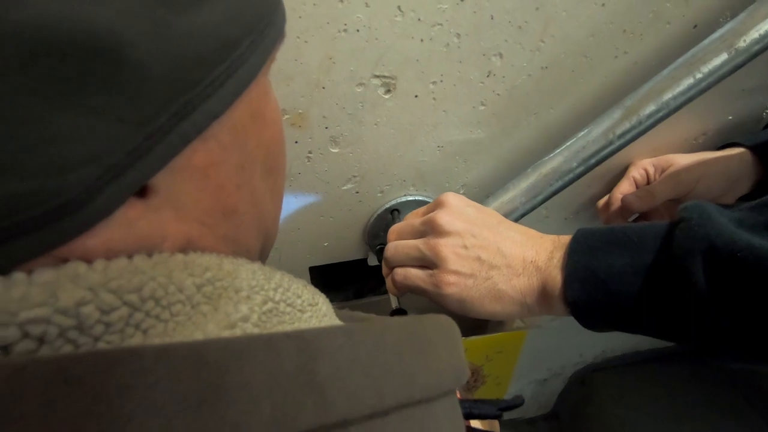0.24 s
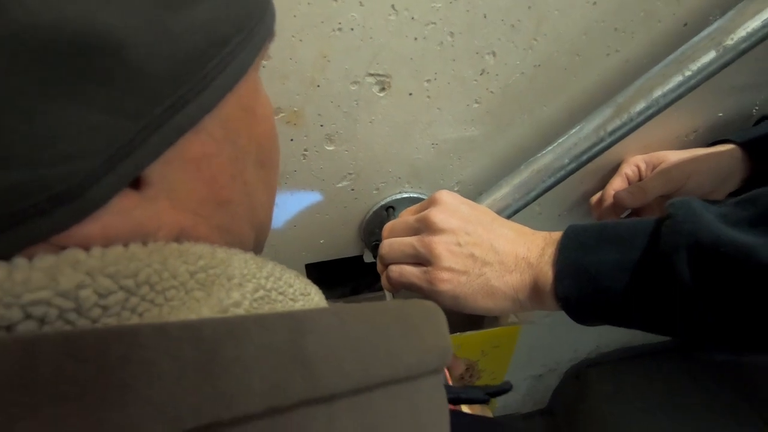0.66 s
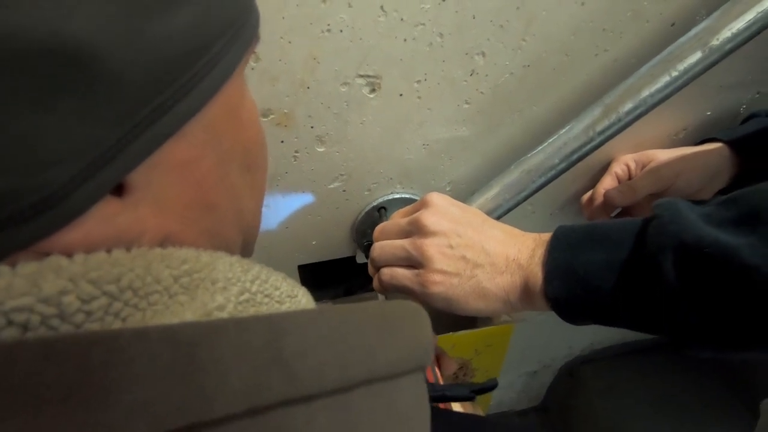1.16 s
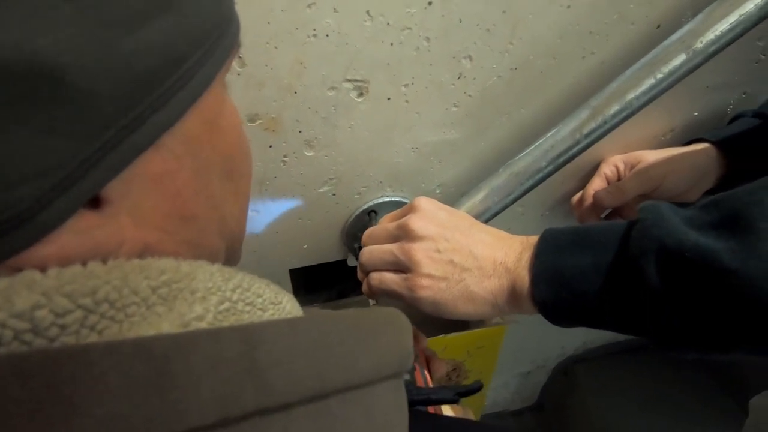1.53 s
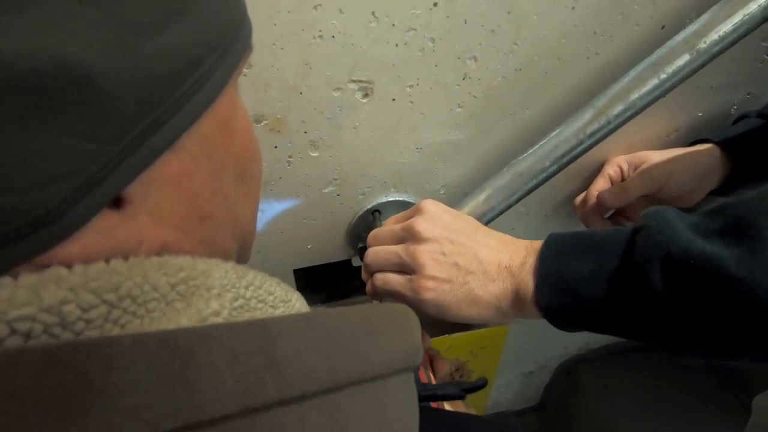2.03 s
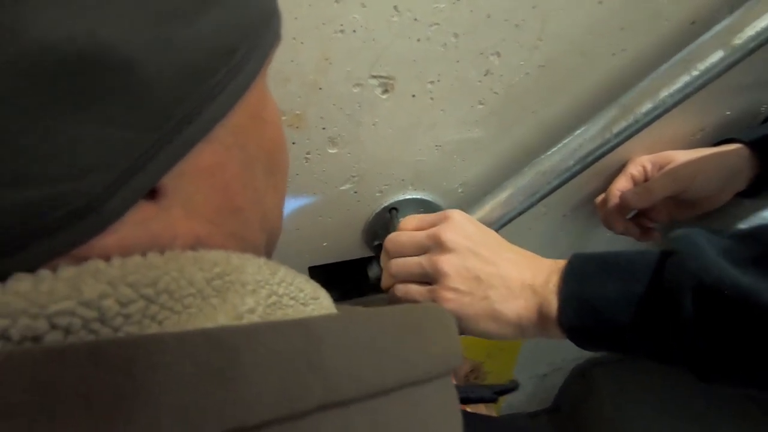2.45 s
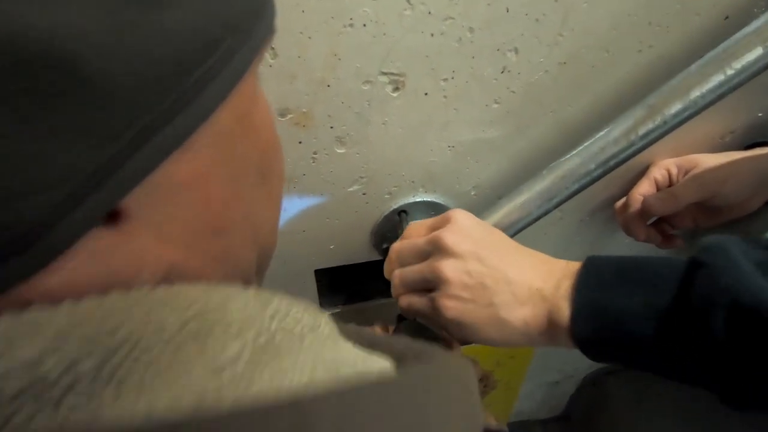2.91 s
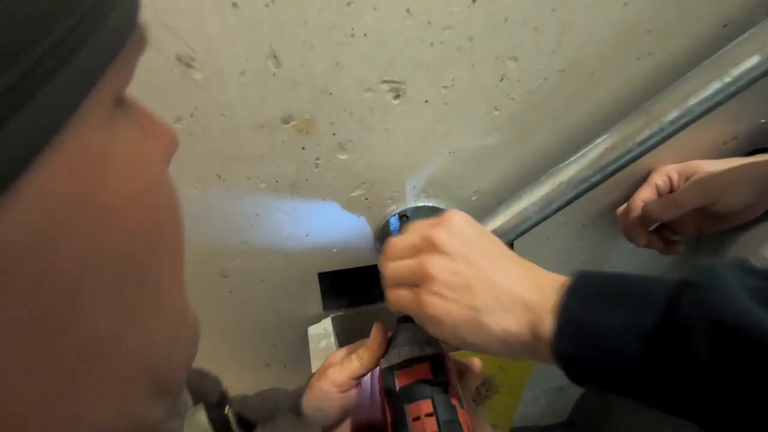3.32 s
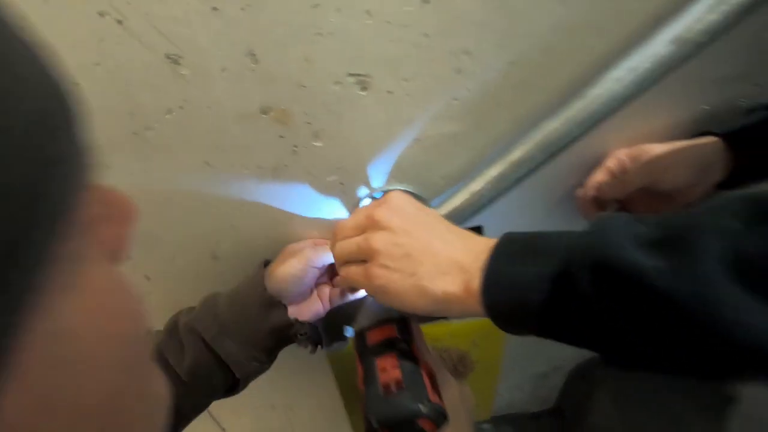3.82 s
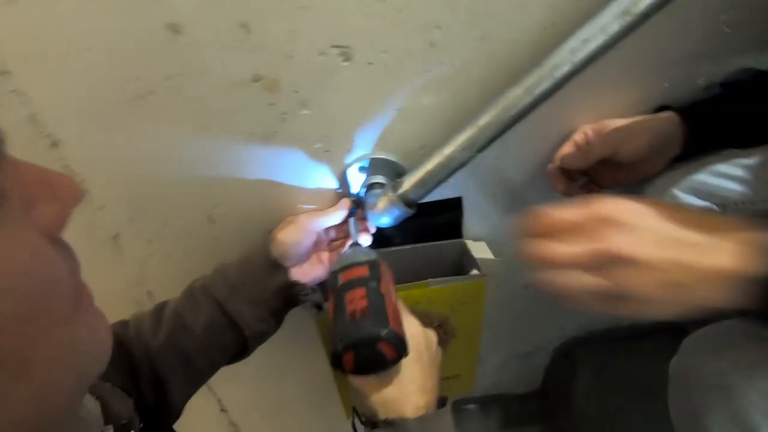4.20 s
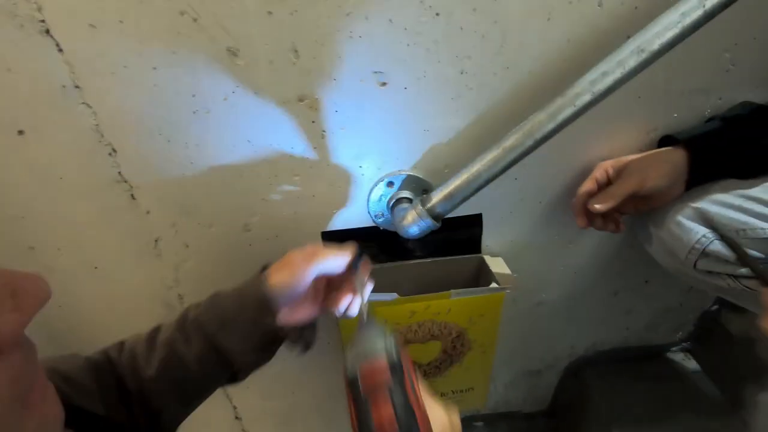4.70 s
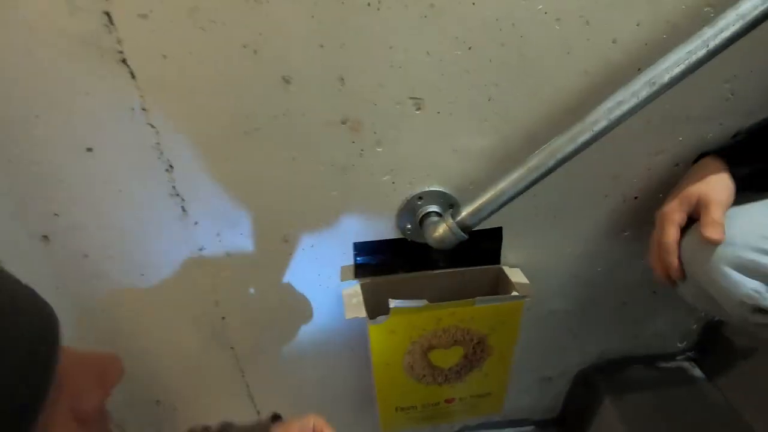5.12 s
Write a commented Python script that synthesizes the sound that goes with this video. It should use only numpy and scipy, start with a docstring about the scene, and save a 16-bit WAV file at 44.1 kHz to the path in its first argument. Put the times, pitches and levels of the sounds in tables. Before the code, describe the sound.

From 0 to about 2.9 seconds a cordless hammer drill works very close by, already at full force: around forty beats a second, each a tight cluster of hard, bright knocks over dense gear rattle, with low throbbing tones locked to the beat. Brief thin high whistles poke through. Around 2.4 to 2.5 seconds the timbre shifts, more pressed and resonant. Near 2.9 it coasts down in a few uneven knocks and stops; the metal rail rings on and the hard concrete stairwell gives a short echo. The microphone's gain slowly recovers, lifting a fluttering deep rumble, building hum and soft air. Cloth rustles about 3.1. Small metallic ticks come from 3.36, clustering with a gritty, slightly squealing scrape at 3.75 to 4.0 as the bit is drawn out. Faint ticks follow to 4.5, a clearer click at 4.94, and a soft rustle near the end at 5.35.

```python
"""A cordless hammer drill beats forty times a second on a steel rail bracket, then coasts to a stop.
Each beat is a cluster of short noise knocks over resonant gear rattle, with low tones locked to the beat.
The rail rings on as decaying sines, and sparse decaying echoes make the concrete stairwell.
A low rumble and soft air come up as the gain control recovers, with small ticks and scrapes of metal
and rustling cloth, all made of shaped noise and a wavering deep tone."""
import sys
import numpy as np
from scipy import signal
from scipy.fft import rfft, irfft
from scipy.io import wavfile
from scipy.ndimage import uniform_filter1d

SR = 44100
rng = np.random.default_rng(int(sys.argv[2]) if len(sys.argv) > 2 else 0)


def wav_out(sig):
    """Save sig, one row per channel (or a flat mono array), as 16-bit PCM at SR to the path in sys.argv[1]."""
    wavfile.write(sys.argv[1], SR, np.round(np.clip(np.atleast_2d(sig).T, -1, 1) * 32767).astype(np.int16))


N = 236067
T = np.arange(N) / SR  # seconds

BEATS_PER_S, STOP_S = 40, 2.88
WHISTLE_HZ, WHISTLE_FADE_DB_PER_S = 6724, 400
TICK_T60_S = 0.04
BOOM_FLUTTER = .55  # share of the boom's level that flutters
HUM_DB, AIR_DB = -56.5, -68
QUIET_DB, MOST_BOOST_DB, RECOVER_DB_PER_S = -46.5, 15, 16
EDGE_HZ = 15850  # top of the band

# How late each hammer cycle falls behind an even beat: start_s, lag_ms
BEAT_LAG = [(0.0, 17.6), (0.2, 18.5), (0.3, 18.1), (0.7, 21.2), (1.05, 21.3), (1.35, 18.9), (1.7, 19.5),
            (2.05, 19.5), (2.2, 18.6), (2.3, 19.2), (2.5, 17.2), (2.72, 15.6), (2.9, 16.4)]
# Knocks inside one hammer cycle:
# offset_ms from the main blow, level_db, t60_ms, tilt_db_per_octave, change_db with the shifted grip
CYCLE_KNOCKS = [(-9.3, -10, 12, 0, 0), (-5.9, -4.5, 12, -2, 0), (-.45, 2.8, 10, 1.6, -2),
                (2.3, -2.5, 13, -1, 1.5), (5.2, -8, 24, 0, 0)]
# How hard the tool works: start_s, rattle_db, blows_db, rattle_tilt_db_per_octave
TOOL_EFFORT = [(0.0, -24.5, -16, 0), (0.02, -24.5, -16.5, 1), (0.12, -28, -15, 1), (1.3, -27, -15.5, 1),
               (2.85, -27.5, -16.5, 2.5), (2.94, -36, -26.5, 0.5), (3.02, -52.5, -20, 1.5)]
# Single blows while the tool coasts down: start_s, level_db
COASTING_BLOWS = [(2.8911, -17.5), (2.9271, -29), (2.9439, -21), (2.9622, -26.5)]
# Spectrum of the gear rattle: pitch_hz, level_db
RATTLE_COLOUR = [(35, -36), (60, -6), (66, -23.5), (113, -1), (146, -3), (198, -8.5), (227, -10.5),
                 (492, -18), (607, -11.5), (682, -11.5), (1660, -2), (2250, -9), (6900, -11.5),
                 (10300, -11.5), (16000, -22)]
# Spectrum of a blow: pitch_hz, level_db
BLOW_COLOUR = [(300, -23), (1000, -5.5), (1800, -6), (2600, -4), (3300, 1.5), (3900, 3), (4600, -2),
               (6000, 0.5), (7200, -1.5), (8600, -3.5), (10100, -1), (11500, -5), (13200, -6.5),
               (14500, -8.5), (16000, -25)]
# Resonances of tool and bracket in the first grip: pitch_hz, width_hz, level_db
HOUSING_MODES = [(1880, 120, -4.5), (4300, 54, -4.5), (5940, 82, -15.5), (6200, 120, -20), (6720, 29, 4),
                 (7160, 59, 7.5), (7100, 220, -8.5), (9020, 93, -11.5), (10100, 360, -3.5),
                 (11000, 66, -16), (11300, 52, -13.5), (11650, 160, 5)]
# Resonances once the grip shifts near the end: pitch_hz, width_hz, level_db
PRESSED_MODES = [(1104, 30, 7), (1220, 27, 0), (1672, 26, -7), (3054, 83, 7), (3330, 400, 1.5),
                 (3950, 100, 2), (5760, 130, 3), (6400, 150, -9.5), (7850, 340, 6), (8960, 100, 0.5),
                 (9300, 110, -7.5), (10800, 83, -7), (10670, 150, 4.5)]
# How far the grip has shifted: start_s, share (0-1)
GRIP_SHIFT = [(0, 0), (2.3, 0.15), (2.52, 0.9), (3.02, 1)]
# Steady tones as the beat shakes the wall: multiple of the beat, level_db
WALL_TONES = [(4, -51), (6, -48.5), (7, -51), (8, -53), (9, -59), (11, -57), (15, -48), (20, -49.5)]
# Two wall tones that swell and sink: start_s, third_multiple_db, fifth_multiple_db
SWELLING_TONES = [(0.0, -45.5, -44), (0.37, -41, -40), (0.65, -42.5, -42), (1.12, -34.5, -44),
                  (1.3, -38, -37.5), (1.5, -39.5, -43), (1.85, -47.5, -42), (2.4, -42.5, -42),
                  (2.55, -46, -44.5), (2.7, -45, -39.5), (2.9, -52.5, -43)]
# Wall tones that come up with the shifted grip: multiple of the beat, level_db
GRIP_TONES = [(18, -45.5), (27, -41.5), (30, -40.5)]
# Spells of one thin ring: start_s, length_s, level_db
WHISTLE_SPELLS = [(0.015, 0.012, -34), (0.284, 0.12, -37), (.44, .08, -36.5), (0.582, .04, -36.5),
                  (0.935, .09, -32.5), (1.246, 0.14, -37), (1.45, .05, -34), (1.612, 0.04, -36),
                  (1.715, .05, -38), (1.971, 0.05, -34.5), (2.376, 0.044, -36), (2.483, 0.11, -40),
                  (2.821, 0.023, -39)]
# Ringing modes of the rail: pitch_hz, level_db, t60_s
RAIL_MODES = [(464, -9, 1.0), (475, -10, 1.0), (721, -3, .35), (800, -6, .5), (1125, -15, .4),
              (1308, -12, .4), (5380, -17, .25), (7197, -12, .35), (8995, -2, .5), (9120, -10, .55),
              (9281, -7, .65), (9399, -4, .7), (9560, -10, .5), (9771, -8, .5), (9846, -9, .5),
              (10930, -7, .3), (12300, -10, .14)]
# Ringing modes of the drill bit and chuck: pitch_hz, level_db, t60_s
BIT_MODES = [(1615, -12, .12), (2390, -10, .2), (2440, -9, .25), (2482, -7, .28), (2620, -9, .15),
             (3400, -10, .08), (3644, -11, .1), (4872, -13, .1), (6720, -9, .13), (7280, -10, .1),
             (8050, -12, .08), (9625, -10, .08)]
# Ticks of the bit on the bracket: start_s, level_db, centre_hz, width_octaves, ring_db
BIT_TICKS = [(3.356, -61, 9940, .3, -33), (3.358, -65, 4900, .3, -40), (3.407, -61, 8500, 0.7, -26),
             (3.542, -69.5, 2630, 0.38, -38), (3.62, -67, 8950, 0.61, -35), (3.752, -60, 2600, 0.47, -40),
             (3.78, -65, 4176, 0.36, -36), (3.81, -63, 3503, .9, -41), (3.869, -53, 3300, 0.26, -30),
             (3.877, -48.5, 3550, 0.75, -45), (3.899, -66.5, 2470, 0.23, -21.5),
             (3.921, -62, 2970, 1.6, -31), (3.95, -60, 7370, 0.61, -39), (4.169, -66, 4550, 0.61, -50),
             (4.334, -68, 3120, 0.47, -55), (4.359, -71, 3950, 0.96, -55), (4.385, -79, 4990, 0.76, -55),
             (4.474, -68, 10050, .25, -55), (4.49, -66, 1935, 0.36, -55), (4.935, -55, 3200, 0.17, -60),
             (4.936, -57, 6120, 0.57, -60), (4.955, -62, 3660, 1, -60)]
# The bit drawn out: start_s, grind_db, squeal_db
BIT_SCRAPE = [(3.68, -84, -107), (3.745, -80, -95), (3.76, -64, -80), (3.8, -59, -73), (3.858, -82, -90),
              (3.88, -60, -62), (3.9, -67, -87), (3.925, -69, -63), (3.954, -60.5, -67), (3.99, -79, -95),
              (4.05, -94, -101)]
# Spectrum of the scrape's grind: pitch_hz, level_db
GRIND_COLOUR = [(530, -39.5), (900, -1.5), (1050, -3.5), (2390, -5), (2820, -2.5), (5080, -7.5),
                (6350, -19), (9820, -15.5), (15000, -37)]
# Deep boom of the stairwell: start_s, level_db, pitch_hz
STAIRWELL_BOOM = [(0.0, -49, 41.4), (.09, -44.5, 41.2), (.3, -41, 38.8), (.36, -57, 38.7), (.55, -43, 39.5),
                  (.9, -51, 38.6), (.97, -41, 37.8), (1.21, -41.5, 40.8), (1.44, -50, 40.4),
                  (1.58, -38, 39.9), (1.82, -53, 38.8), (1.95, -39, 41.4), (2.2, -40, 42.6),
                  (2.42, -38.5, 40.5), (2.7, -38.5, 40.7), (2.85, -48, 40.95), (2.92, -43.5, 41.3),
                  (3.4, -42, 41.8), (3.47, -46.5, 37.1), (3.8, -44.5, 39), (3.95, -44.5, 41.93),
                  (4.25, -47.5, 38.37), (4.5, -44.5, 39.34), (4.72, -42.5, 43.5), (4.9, -48.5, 39.58),
                  (5.28, -48.5, 38.75), (5.35, -54, 43.1)]
# Spectrum of the noise in the boom: pitch_hz, level_db
BOOM_COLOUR = [(8.8, -31.5), (15, 0), (27, 1), (46, -2), (56, -13.5), (75, -5.5), (98, -35), (160, -120)]
# Spectrum of the building's hum: pitch_hz, level_db
HUM_COLOUR = [(38, -37), (65, -13.5), (75, -1), (107, -8.5), (146, 0.5), (183, -26.5), (214, -10.5),
              (242, -48.5), (326, -25.5), (400, -73), (520, -64), (880, -120)]
# Spectrum of the soft air: pitch_hz, level_db
SOFT_AIR_COLOUR = [(150, -24), (250, 4.5), (348, 7), (407, 2), (1380, -6.5), (1530, -7.5), (1850, -9),
                   (7980, -23.5), (16000, -31)]
# Cloth rustle: start_s, level_db
CLOTH_RUSTLE = [(3.1, -59), (3.37, -85.5), (3.73, -82), (3.9, -77), (3.98, -95), (4.3, -83.5), (5.24, -73),
                (5.35, -65)]
# Spectrum of the cloth: pitch_hz, level_db
CLOTH_COLOUR = [(1060, -33.5), (1800, -1.5), (3480, 0), (3950, 1), (6180, -2), (8590, -0.5), (15100, -18),
                (16000, -22.5)]
# How long the stairwell echoes: pitch_hz, t60_s
STAIRWELL_DECAY = [(200, 0.86), (1000, 0.63), (4000, 0.2), (9000, 0.19), (15000, 0.12)]


def gain_of(db):
    """Amplitude factor of a level in dB."""
    return 10 ** (np.asarray(db) / 20)


def evened(x):
    """Scales a sound, or each row, to an RMS of 1."""
    return x / np.sqrt(np.mean(x ** 2, axis=-1, keepdims=True) + 1e-20)


def read(points, hz):
    """Reads a table over frequency, straight on a log-frequency axis."""
    f, value = np.transpose(points)
    return np.interp(np.log(hz + 1), np.log(f + 1), value)


def curves(rows, before=None, after=None):
    """Draws every column of a timed table at every sample."""
    s, *columns = np.transpose(rows)
    return [np.interp(T, s, c, before, after) for c in columns]


def add(mix, s, sound):
    """Lays a sound into the mix at s seconds."""
    part = mix[round(s * SR):][:len(sound)]
    part += sound[:len(part)]


def resonate(x, hz, width):
    """Shifts hz down to zero, smooths, and shifts back: a resonance of gain 1."""
    turn = np.exp(2j * np.pi * hz * T)
    r = np.exp(-np.pi * width / SR)
    return 2 * (turn * signal.lfilter([1 - r], [1, -r], x / turn)).real


def noise(colour, size, patchy_db, tilt_db=0 * T):
    """Random short-time spectra of a colour, with drifting patches and a tilt about 3 kHz."""
    hop = size // 4
    frames, hz = N // hop + 5, np.fft.rfftfreq(size, 1 / SR)
    a, b, patches = rng.standard_normal((frames, len(hz), 3)).T
    patches = uniform_filter1d(patches, size=9, axis=0)  # across frequency
    patches = uniform_filter1d(patches, size=14, axis=1)  # across time
    frame_tilt_db = tilt_db[np.minimum(np.arange(frames) * hop, N - 1)]
    tilt = np.log2((hz[:, None] + 200) / 3200) * frame_tilt_db
    level_db = read(colour, hz)[:, None] + patchy_db * patches / patches.std() + tilt
    spectra = (a + 1j * b) * gain_of(level_db)
    return evened(signal.istft(spectra, nperseg=size, noverlap=size - hop)[1][:N])


def ring(x, modes):
    """Struck metal: each push in x starts a set of decaying sines."""
    t = T[:SR]
    response = sum(gain_of(db - 60 * t / t60) * np.sin(2 * np.pi * hz * t) for hz, db, t60 in modes)
    return signal.fftconvolve(x, response)[:N]


def bursts(colour_db, t60_s, rise_s):
    """Rows of short noise bursts, one spectrum and one decay a row, each with the energy of its envelope."""
    t = T[:1024]
    shape = (1 - np.exp(-t / rise_s)) * gain_of(-60 * t / t60_s[:, None])
    crack = shape * irfft(rfft(rng.standard_normal(shape.shape)) * gain_of(colour_db))
    return evened(crack) * np.sqrt(np.mean(shape ** 2, axis=1, keepdims=True))


def stairwell(x):
    """Echo off hard walls: sparse taps of random sign, each band dying at its own speed."""
    taps = np.zeros(SR)
    at = np.arange(200, SR - 20, 20)
    taps[at + rng.integers(0, 20, len(at))] = rng.choice([-1., 1.], len(at))
    hz, t, spectra = signal.stft(taps, SR, nperseg=256)
    decay = gain_of(-60 * t / read(STAIRWELL_DECAY, hz)[:, None])
    tail = signal.istft(spectra * decay, SR, nperseg=256)[1]
    return signal.fftconvolve(x, tail / np.linalg.norm(tail))[:N]


def background():
    """A fluttering deep tone and coloured noises: stairwell boom, building hum, air, cloth near the mic."""
    boom_db, boom_hz = curves(STAIRWELL_BOOM)
    flutter = resonate(rng.standard_normal(N), 7., 9.)
    flutter = evened(resonate(flutter, 7., 9.))
    tone = np.sqrt(2) * np.sin(2 * np.pi * np.cumsum(boom_hz) / SR)
    boom = tone + .5 * noise(BOOM_COLOUR, size=8192, patchy_db=0)
    boom = gain_of(boom_db) * (1 + BOOM_FLUTTER * np.tanh(flutter)) * boom
    hum = gain_of(HUM_DB) * noise(HUM_COLOUR, size=4096, patchy_db=.8)
    air = gain_of(AIR_DB) * noise(SOFT_AIR_COLOUR, size=1024, patchy_db=.8)
    rustle = gain_of(curves(CLOTH_RUSTLE)[0]) * noise(CLOTH_COLOUR, size=256, patchy_db=1.5)
    return boom + hum + air + rustle


def handling():
    """Noise ticks that ring the bit, and a grinding, squealing scrape as it is drawn out."""
    s, db, hz, wide, ring_db = np.transpose(BIT_TICKS)
    octaves = np.log2((np.fft.rfftfreq(1024, 1 / SR) + 50) / hz[:, None])
    colour_db = np.maximum(-6 * (octaves / wide[:, None]) ** 2, -40)
    cracks = bursts(colour_db, TICK_T60_S + 0 * s, rise_s=.0004)
    ticks, pushes = np.zeros((2, N))
    for at, g, push, crack in zip(s, gain_of(db), gain_of(ring_db), cracks):
        add(ticks, at, g * crack)
        add(pushes, at, g * push * crack)
    grind_db, squeal_db = curves(BIT_SCRAPE, -120, -120)
    grind = gain_of(grind_db) * noise(GRIND_COLOUR, size=256, patchy_db=2.5)
    squeal = resonate(rng.standard_normal(N), 9700, 500.)
    squeal = gain_of(squeal_db) * evened(resonate(squeal, 9700, 500.))
    return ticks + ring(pushes + gain_of(-36) * grind, BIT_MODES) + grind + squeal


def rail(tool):
    """The tool's sound drives the rail's modes, which ring freely once the tool eases off."""
    released = np.clip((T - STOP_S + .12) / .14, 0, 1) ** 2
    return gain_of(-40) * ring(tool * released, RAIL_MODES)


def whistle():
    """Short spells of a thin ring: very narrow noise with its own swells mostly levelled out."""
    tone = resonate(rng.standard_normal(N), WHISTLE_HZ, 8.)
    level = 0
    for s, length, db in WHISTLE_SPELLS:
        outside_s = np.maximum(3 * (s - T), T - s - length)  # comes in three times as fast as it fades
        level = level + gain_of(db - WHISTLE_FADE_DB_PER_S * np.maximum(0, outside_s))
    return level * tone / np.sqrt(abs(uniform_filter1d(tone ** 2, size=1500)))


def grip_share():
    """How far the hand has moved to the shifted grip, from 0 to 1."""
    return np.clip(curves(GRIP_SHIFT)[0], 0, 1)


def throb():
    """The shaken wall: low multiples of the beat, locked to the hammer, each wavering a little."""
    smooth_lag_ms = uniform_filter1d(curves(BEAT_LAG)[0], size=4000)
    turns = BEATS_PER_S * (T - smooth_lag_ms / 1000)
    level = dict(WALL_TONES)
    level[3], level[5] = curves(SWELLING_TONES)
    grip = grip_share()
    tones = [(k, gain_of(db)) for k, db in level.items()]
    tones += [(k, grip * gain_of(db)) for k, db in GRIP_TONES]
    out = 0
    for k, g in tones:
        waver_db = evened(resonate(rng.standard_normal(N), 0.51, 14.0))
        out = out + g * gain_of(waver_db) * np.sin(2 * np.pi * (k * turns + rng.random()))
    return out * np.clip((STOP_S + .05 - T) / 0.08, 0, 1)


def rattle():
    """Gears and the bit grinding in the hole: dense noise, stronger at the housing's resonances."""
    rattle_db, _, tilt_db = curves(TOOL_EFFORT)
    grind = noise(RATTLE_COLOUR, size=512, patchy_db=1.0, tilt_db=tilt_db)
    loose = sum(gain_of(db) * resonate(grind, hz, width) for hz, width, db in HOUSING_MODES)
    pressed = sum(gain_of(db) * resonate(grind, hz, width) for hz, width, db in PRESSED_MODES)
    grip = grip_share()
    body = evened(grind + 0.93 * (1 - grip) * loose + 1.3 * grip * pressed)
    cycle = (BEATS_PER_S * (T - curves(BEAT_LAG)[0] / 1000)) % 1
    rattle_db = rattle_db - 2.5 * (cycle - .5)  # the shaking dies a little until the next main blow
    rundown_db = 280 * np.maximum(T - 3.02, 0)
    return gain_of(rattle_db - rundown_db) * body


def blows():
    """Each cycle is a cluster of noise knocks; no two land with quite the same force, moment or colour."""
    beat = np.arange(0, STOP_S - .02, 1 / BEATS_PER_S)
    beat = beat + np.interp(beat, *np.transpose(BEAT_LAG)) / 1000
    ms, db, t60_ms, tilt, grip_db = np.transpose(CYCLE_KNOCKS)[:, :, None]
    late, force = rng.standard_normal((len(beat), len(ms), 2)).T
    effort_db = np.interp(beat, T, curves(TOOL_EFFORT)[1])
    strength_db = effort_db + grip_db * np.interp(beat, *np.transpose(GRIP_SHIFT))
    # the coasting blows follow the knocks in every list
    coast_s, coast_db = np.transpose(COASTING_BLOWS)
    s = np.append(beat + (ms + .25 * late) / 1000, coast_s)
    level_db = np.append(strength_db + db + 1.2 * force, coast_db)
    t60_s = np.append(t60_ms + 0 * beat, 15 + 0 * coast_s) / 1000
    tilt_db = np.append(tilt + 0 * beat, 0 * coast_s)[:, None]
    hz = np.fft.rfftfreq(1024, 1 / SR)
    lumps_db = 2.2 * evened(uniform_filter1d(rng.standard_normal((len(s), 513)), size=30))
    colour_db = read(BLOW_COLOUR, hz) + tilt_db * np.log2((hz + 200) / 5200) + lumps_db
    out = np.zeros(N)
    for at, g, crack in zip(s, gain_of(level_db), bursts(colour_db, t60_s, rise_s=.0003)):
        add(out, at, g * crack)
    return out


def scene():
    """Tool, rail and handling echo in the stairwell; throb, whistle and background join without echo."""
    tool = blows() + rattle()
    near = tool + rail(tool) + handling()
    heard = near + gain_of(-9.0) * stairwell(near) + throb() + whistle() + background()
    return np.array([heard, heard])  # one microphone feeds both channels


def record(dry):
    """Gain control, deaf to bass, creeps up once the tool is quiet; loud peaks lean downward; band limit."""
    without_bass = dry[0] - uniform_filter1d(dry[0], size=60)
    power = uniform_filter1d(without_bass ** 2, size=2000)
    # the held level jumps up with the sound and sinks at the recovery speed
    fall_db = RECOVER_DB_PER_S * T
    held_db = np.maximum.accumulate(10 * np.log10(abs(power) + 1e-12) + fall_db) - fall_db
    boost_db = MOST_BOOST_DB - np.clip(held_db - QUIET_DB, 0, MOST_BOOST_DB)
    lifted = dry * gain_of(boost_db)
    leaning = lifted - 1.1 * lifted ** 2
    centred = leaning - uniform_filter1d(leaning, size=4410)
    rounded = .5 * np.tanh(centred / .5)  # the largest peaks are rounded off
    band_limit = signal.firwin(511, EDGE_HZ, window=("kaiser", 9), fs=SR)
    return signal.oaconvolve(rounded, band_limit[None], "same")


dry = scene()
out = record(dry)
wav_out(out)
```